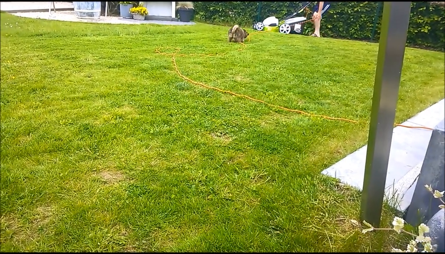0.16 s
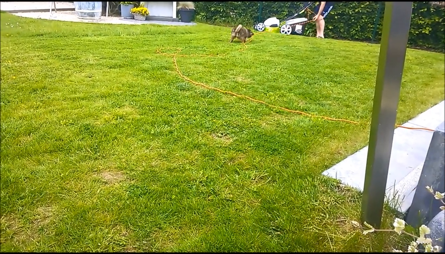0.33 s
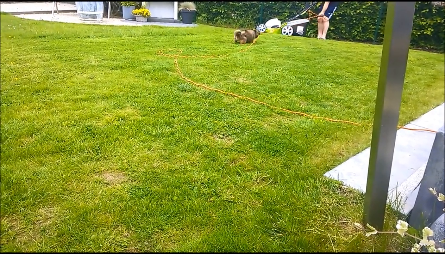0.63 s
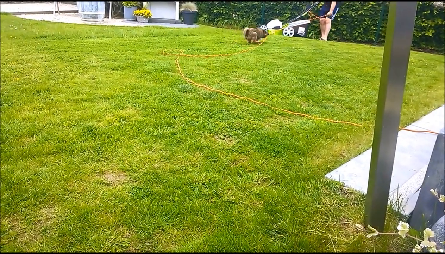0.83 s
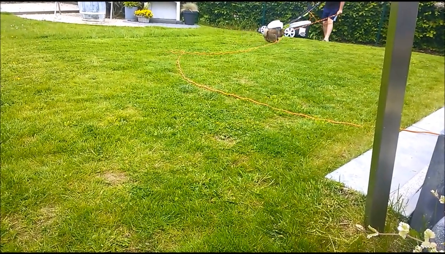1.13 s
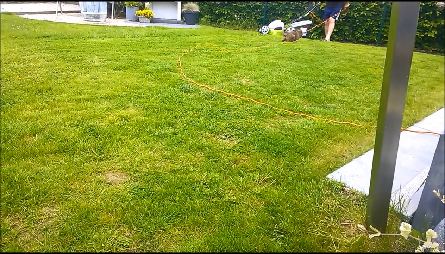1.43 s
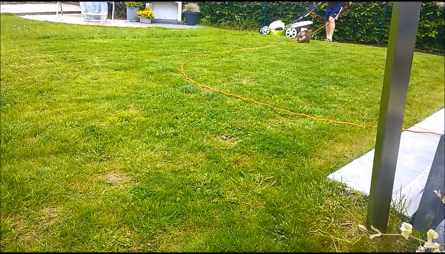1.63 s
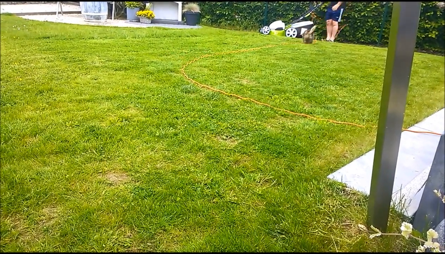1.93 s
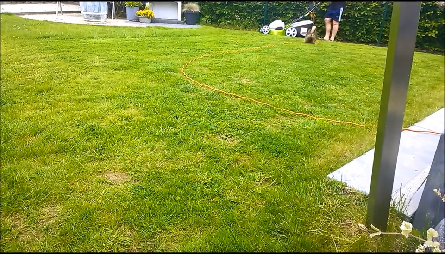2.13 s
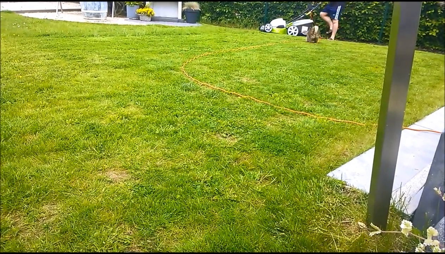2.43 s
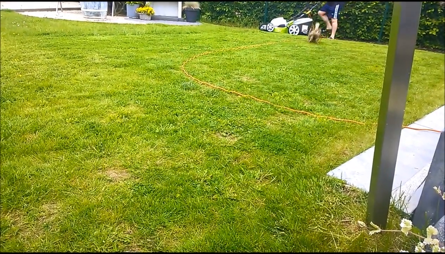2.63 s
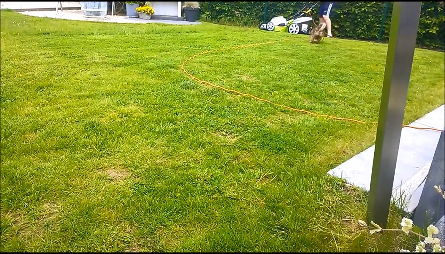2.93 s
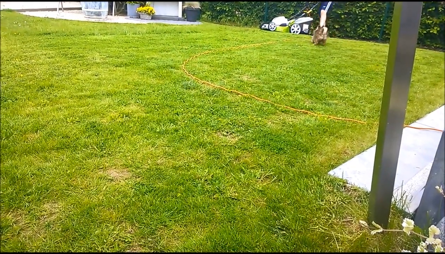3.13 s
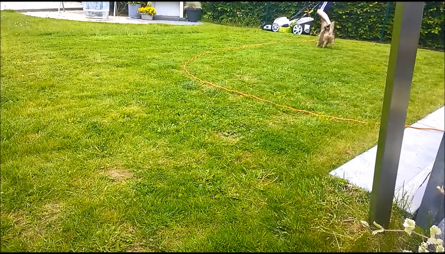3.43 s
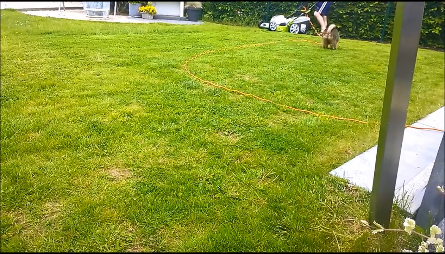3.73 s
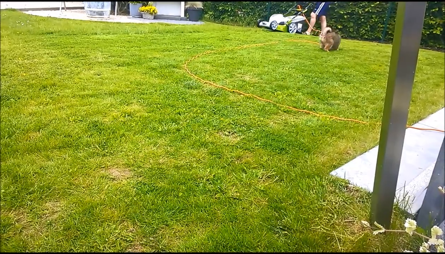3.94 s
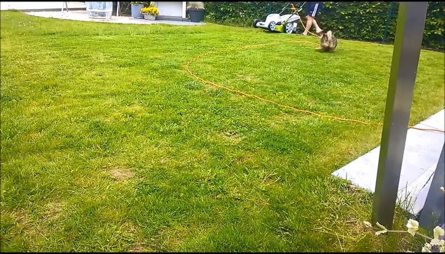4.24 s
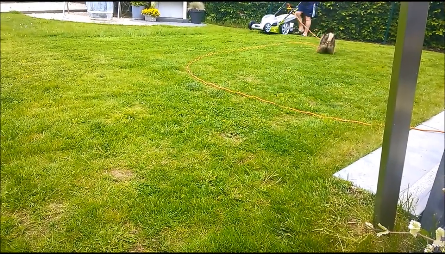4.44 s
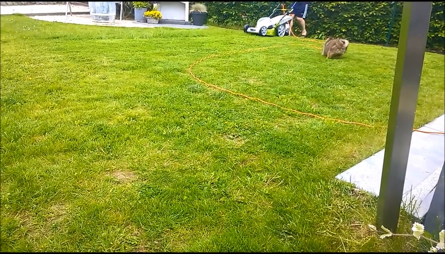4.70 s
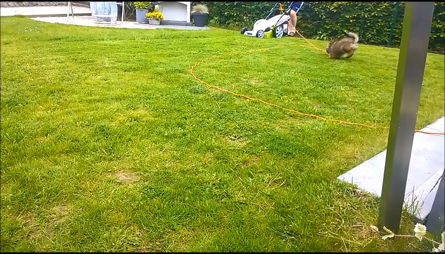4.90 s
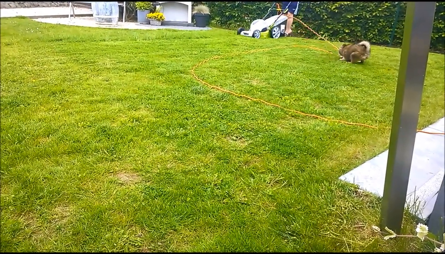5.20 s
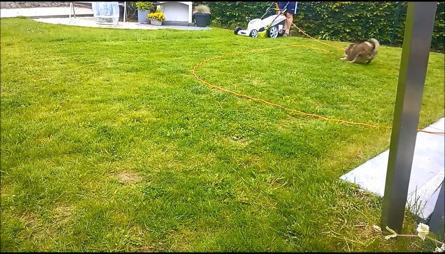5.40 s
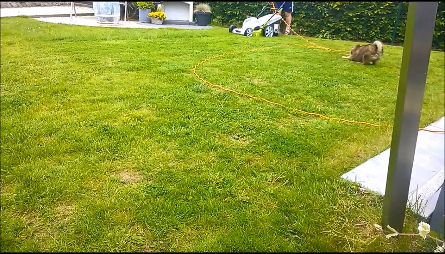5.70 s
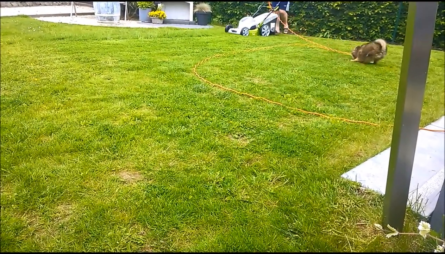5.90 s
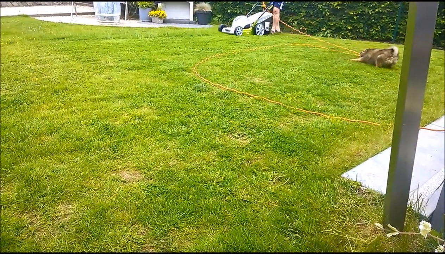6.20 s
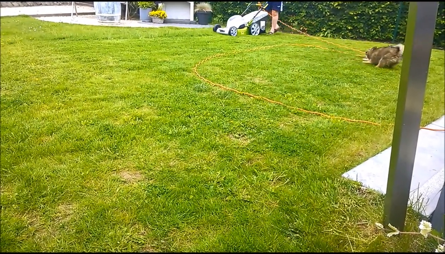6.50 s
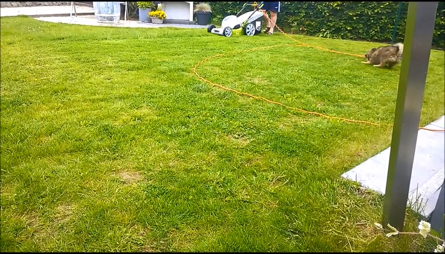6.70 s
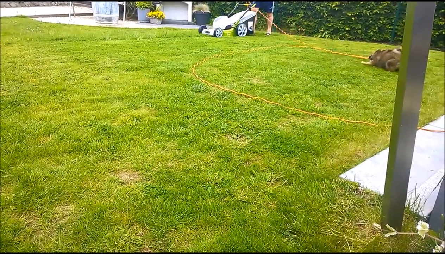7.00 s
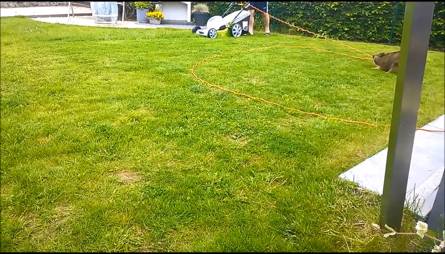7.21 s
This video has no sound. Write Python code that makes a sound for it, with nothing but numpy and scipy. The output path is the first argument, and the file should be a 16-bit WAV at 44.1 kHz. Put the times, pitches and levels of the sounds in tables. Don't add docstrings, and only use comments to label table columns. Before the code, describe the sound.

Outdoors in a garden, a steady low electric motor and blade drone dominates, with soft air roar and faint grass hiss. Very faint bird chirps hide beneath it early on. The mower swings round: the tone swells with raspy overtones, then the deep hum drops while a breathy, gusting hiss comes forward. Late on, blade and twigs collide in two woody cracks. Distant fixed microphone, slight microphone hiss.

```python
import sys
import numpy as np
from scipy import signal
from scipy.fft import rfft, irfft, next_fast_len
from scipy.io import wavfile
from scipy.ndimage import uniform_filter1d

SR = 44100
rng = np.random.default_rng(int(sys.argv[2]) if len(sys.argv) > 2 else 0)


def unload_wav(signal):
    wavfile.write(
        sys.argv[1],
        SR,
        np.round(np.clip(np.atleast_2d(signal).T, -1, 1) * 32767).astype(np.int16),
    )


def level_to_linear(level):
    exponent = np.asarray(level, float) / 20
    return 10 ** exponent


N = 324130
TIME = np.arange(N) / SR


def curves(table):
    s, *columns = np.transpose(table)
    return [np.interp(TIME, s, column) for column in columns]


def walk(rate):
    hold = int(SR / rate)
    steps = np.repeat(rng.standard_normal(N // hold + 1), hold)
    return 1.3 * uniform_filter1d(uniform_filter1d(steps, hold), hold)[:N]


def swells(rows):
    return sum(db * np.exp(-((TIME - s) / width) ** 2) for s, width, db in rows)


def gust(s, db, held, rise_db, fall_db):
    return db - rise_db * np.clip(s - TIME, 0, None) - fall_db * np.clip(TIME - s - held, 0, None)


def noise(spectrum, patchy_db, rate, within=(0, SR)):
    size = next_fast_len(N)
    hz = np.arange(1, size // 2 + 2) * SR / size
    f, db = np.transpose(spectrum)
    colour = level_to_linear(np.interp(np.log(hz), np.log(f), db, -150, -150))
    bins = rfft(rng.standard_normal(size)) * colour
    inside = irfft(bins * (hz > within[0]) * (hz < within[1]), size)
    place = 2 * np.log2(hz / f[0])
    out = 0
    for band in range(int(2 * np.log2(f[-1] / f[0])) + 2):
        share = np.clip(1 - abs(place - band), 0, 1)
        out = out + irfft(bins * share, size)[:N] * level_to_linear(patchy_db * walk(rate))
    return out / inside.std()


# (time [s], blade pass [Hz], hum level [dB], lift of the deck tones [dB])
SWING = [(0, 97.95, -26, -1.5), (1.12, 97.65, -26.5, -0.7), (2.38, 98.2, -26, -2), (3.15, 97.5, -30.5, 2.5),
         (3.25, 97.5, -29.0, 3), (3.6, 96.7, -28, 2), (3.72, 97.34, -30.2, 4.5), (4.18, 97.44, -23.2, 9),
         (4.38, 97.17, -23.5, 9.5), (4.73, 97.48, -25.5, 11.5), (4.88, 96.4, -32.5, 10.3),
         (5.12, 96.3, -34.9, 6), (5.5, 96.6, -34.7, 6.5), (5.9, 97.07, -26.5, 5.5),
         (6.12, 96.79, -30.5, 3.2), (6.38, 96.5, -27.5, 4.5), (6.48, 96.7, -31, 4), (7.35, 97.3, -25.5, 5)]


def swing():
    return curves(SWING)


# (time [s], share of direct sound [0-1])
FACING = [
    (0, 0),
    (3.75, 0.16),
    (4.25, .95),
    (4.82, .95),
    (5.05, 0.2),
    (7.35, 0),
]


def facing():
    return curves(FACING)[0]


def turned():
    turn_s, turn_length_s = 4.83, .05
    return np.clip((TIME - turn_s) / turn_length_s, 0, 1)


# (time [s], half width [s], level [dB])
THICK_GRASS = [
    (0.0, .12, 1),
    (2.7, .2, 1.5),
    (3.65, .25, 2),
    (4.92, .09, 3.5),
    (6.2, .22, 3.5),
    (6.95, .1, 1.2),
]


def thick_grass():
    return swells(THICK_GRASS)


# (level with the deck down [dB], share of the lift [ratio], flutter [dB])
ORDER_RULES = [
    (-29.1, 0.035, 0.1),
    (-46.5, 0.91, .6),
    (-39.5, -0.034, .5),
    (-44, 0.62, .8),
    (-48, 1.37, .5),
    (-59, 1.1, 1.0),
    (-51.8, 0.5, .8),
]
# (time [s], half width [s], level [dB])
ECHO_SWELLS = [
    [(2.93, 0.49, 3.5), (3.6, .06, 2.5), (3.93, 0.096, 5.5), (4.53, .2, -2), (5.62, 0.4, 3), (5.93, .06, 3),
     (6.45, 0.21, -8), (6.47, .035, -9), (7.02, .09, 3), (7.35, 0.075, 1.5)],
    [(.03, 0.16, 6.8), (.53, .3, -3.5), (2.48, 0.051, -5.5), (3.53, 0.14, 5.5), (4.62, .2, 3),
     (5.0, 0.068, -4.1), (5.28, .09, 8.5), (6.23, 0.26, 3.5), (6.68, 0.78, 5), (6.85, 0.092, 4),
     (7.23, 0.089, 4.5)],
    [(.73, .45, 1.2), (2.43, 0.15, -4), (2.93, 0.17, 2), (3.97, .1, 5), (4.6, 0.19, 1.5), (5.2, 0.24, -5.9),
     (5.98, .1, -16), (6.14, .1, -16), (6.65, 0.37, -5)],
]
# (time [s], half width [s], level [dB])
DECK_SWELLS = [
    [(2.85, .3, 3), (4.3, .49, 4), (5.27, .17, -6.5), (6.33, 0.81, -2.5), (7.1, .035, -10),
     (7.3, 0.11, 8.5)],
    [(.12, .13, -4), (2.9, .45, 4.5), (3.85, 0.09, -4), (5.65, .2, 2.5), (6.28, 0.055, -4),
     (6.58, .11, 5.5)],
    [(.08, .35, 7.5), (3.28, 0.12, -8), (3.8, .15, 4), (5.1, .09, -10), (5.45, 0.17, 4), (6.43, 0.056, -7),
     (6.98, .2, 6)],
    [(.23, 0.14, -8), (3.05, .45, -5.5), (3.5, .06, -7), (3.72, .12, 2.5), (4.38, .04, -8), (5.1, .12, 1),
     (5.7, .06, 2.5), (5.9, .7, 4), (7.2, 0.049, 6.5)],
]


def order_levels(hum_db, lift_db):
    levels = [hum_db]
    for (db, share, flutter_db), rows in zip(ORDER_RULES, ECHO_SWELLS + DECK_SWELLS):
        levels.append(db + share * lift_db + swells(rows) + flutter_db * walk(6))
    return levels


def tone(turn, order, db, rough_db, wander):
    scatter = rng.uniform(-np.pi, np.pi) + wander * walk(0.786)
    phase = order * turn + .07 * order ** 2 + (1 - facing()) * scatter
    return np.sqrt(2) * level_to_linear(db + rough_db * walk(18)) * np.cos(phase)


# (order of the blade pass, level re order 8 [dB])
TOP_ORDERS = [
    (9, -5),
    (10, -12),
    (11, -20.5),
    (12, -17.5),
]
# (order of the blade pass, level re -24.5 dB [dB])
UNEVEN_ORDERS = [
    (.5, -41),
    (1.5, -27),
    (2.5, -32.5),
    (4.5, -34),
]


def blade(turn, low_db, deck_db):
    low = sum(tone(turn, k + 1, db, 0.3 + 0.067 * k, 1.0) for k, db in enumerate(low_db))
    deck = sum(tone(turn, k + 5, db + 0.54, 1.0, 0.59) for k, db in enumerate(deck_db))
    top = sum(tone(turn, k, deck_db[-1] + db, rough_db=0.0, wander=0.57) for k, db in TOP_ORDERS)
    uneven = sum(tone(turn, k, -24.5 + db, rough_db=5.0, wander=2.1) for k, db in UNEVEN_ORDERS)
    return low + deck + top + uneven


# (frequency [Hz], level [dB per Hz])
LOW_ROAR = [(12, -17), (25, -14.5), (38, -10.5), (50, -4.5), (61, 0.5), (70, -3), (80, -3), (122, -5),
            (165, 0), (232, -1), (268, -2.5), (330, -6.5), (440, -4.5), (600, -16.5)]


def low_air():
    db = -48 - 1.1 * turned() + 0.98 * walk(3)
    return level_to_linear(db) * noise(LOW_ROAR, 0.88, 4, within=(112, 180))


# (frequency [Hz], level [dB per Hz])
DECK_ROAR = [(220, -10.5), (330, 8), (445, 10), (560, 9), (640, 2.5), (730, 4), (830, 6.5), (950, 4),
             (1000, 0.5), (1150, 0), (1265, 0.5), (1335, -8), (1500, -14.5), (2000, -30)]


def deck_air(lift_db):
    db = -53 + .45 * lift_db + .5 * thick_grass()
    return level_to_linear(db) * noise(DECK_ROAR, 1.0, 8, within=(900, 1350))


# (frequency [Hz], level [dB per Hz])
CLIPPINGS = [(1200, -15.5), (1450, -4.5), (1700, 4), (2000, 3), (2300, -2), (2750, -4.5), (3200, -7.5),
             (3800, -9.5), (4500, -13.5), (4900, -19), (5400, -29.5), (6500, -46)]


def clippings(lift_db):
    db = -65.5 + 0.16 * lift_db * (1 - turned()) + 6.5 * turned() + thick_grass()
    return level_to_linear(db) * noise(CLIPPINGS, 1.3, 8.5, within=(1500, 4800))


# (frequency [Hz], level [dB per Hz])
WHISTLE = [(3800, -16.5), (4600, -10), (5250, -9.5), (5600, -1.5), (6100, -1), (6700, -7), (7400, -11.5),
           (8100, -18), (9000, -26), (9500, -41.5)]
# (time [s], level [dB], held [s])
FAN_GUSTS = [(4.02, -81, .02), (4.13, -74, 0.074), (4.25, -69.5, .02), (4.33, -70, 0.043), (4.44, -72, .03),
             (4.61, -72, 0.11), (4.86, -65, 0.066), (4.96, -67, 0.081), (5.12, -69.5, .04),
             (5.2, -69.5, .05), (5.32, -71, .02), (5.4, -72, 0.031), (5.52, -75, 0.019), (5.59, -78, 0.056),
             (5.74, -77, 0.095), (5.91, -72.5, .12), (6.12, -70, 0.077), (6.259, -70.5, .1),
             (6.411, -70, 0.079), (6.55, -83, 0.069), (6.685, -75, 0.014), (6.78, -79, 0.028),
             (6.89, -77.5, .1), (7.1, -75, .04), (7.21, -76, 0.029)]


def fan():
    rise_db_s, fall_db_s = 200, 140
    gust_db = np.max([gust(*row, rise_db_s, fall_db_s) for row in FAN_GUSTS], axis=0)
    seen_db = gust(4.12, -81, 2.38, rise_db_s, fall_db_s) + 1.5 * walk(14)
    hidden_db = -87.5
    power = level_to_linear(2 * gust_db) + level_to_linear(2 * seen_db) + level_to_linear(2 * hidden_db)
    return np.sqrt(power) * noise(WHISTLE, .7, 25, within=(5400, 8000))


def drone():
    phase = 2 * np.pi * np.cumsum(61.7 + 1.5 * walk(5)) / SR
    return np.sqrt(2) * level_to_linear(-50.5 + 1.3 * walk(5.4)) * np.sin(phase)


# (time [s], peak level [dB], ring [Hz], decay [s])
SNAPS = [
    (0.0338, -51.5, 5340, 0.0046),
    (1.347, -52, 2900, .006),
    (5.714, -53, 4000, .02),
    (6.8798, -29, 824, 0.015),
    (7.1847, -15.2, 1000, 0.009),
]


def snaps():
    out = np.zeros(N)
    for s, db, hz, t60 in SNAPS:
        t = np.clip(TIME - s, 0, None)
        ring = np.sin(2 * np.pi * hz * t) * np.exp(-np.log(1000) * t / t60)
        crack = np.sin(2 * np.pi * 1.68 * hz * t) * np.exp(-np.log(1000) * t / (0.35 * t60))
        contact = np.hanning(int(.28 * SR / hz) + 3)
        out -= level_to_linear(db) * np.convolve(ring + 0.74 * crack, contact / contact.sum())[:N]
    return out


# (time [s], length [s], level [dB], frequency [Hz], width [Hz])
CHIRPS = [
    (0.755, .05, -83, 5300, 600),
    (1.22, .04, -87.5, 5450, 200),
    (1.61, .05, -82.5, 5500, 700),
]


def chirps():
    out = 0
    for s, length, db, hz, width_hz in CHIRPS:
        swell = np.sin(np.pi * np.clip((TIME - s) / length, 0, 1))
        spectrum = [(hz - width_hz, -12), (hz, 0), (hz + width_hz, -12)]
        out = out + level_to_linear(db) * swell * noise(spectrum, 0, 5)
    return out


# (frequency [Hz], level [dB per Hz])
OPEN_DECK = [(2200, -17.5), (2600, -0.5), (3500, 0.5), (4600, -4), (5200, -8), (5800, -16.5)]


def open_deck():
    return level_to_linear(-71.5) * facing() * noise(OPEN_DECK, 1.7, 11.0)


# (frequency [Hz], level [dB per Hz])
DECK_MOUTH = [(600, -22), (780, -2), (870, -2), (960, -3), (1150, -16.5), (1250, -29)]


def deck_mouth():
    return level_to_linear(-46) * swells([(4.5, .5, 1)]) * noise(DECK_MOUTH, .5, 7.9)


# (frequency [Hz], level [dB per Hz])
CHUTE = [(1900, -15), (2200, 0), (2600, 0), (2900, -15)]


def chute():
    return level_to_linear(-70) * turned() * noise(CHUTE, 1.5, 7.5)


# (frequency [Hz], level [dB per Hz])
SPRAY = [(3500, 0), (4500, 6), (6500, 8), (8100, 2), (9400, -2), (10200, -2), (12000, -0.5), (14000, -6),
         (16500, -2)]


def spray():
    db = gust(4.885, -71, held=.035, rise_db=560, fall_db=300)
    return level_to_linear(db) * noise(SPRAY, 0.28, 22, within=(8500, 15500))


def air(turn, lift_db):
    push = 1 + 0.22 * np.cos(turn)
    return low_air() + (deck_air(lift_db) + deck_mouth()) * push


def hiss(turn, lift_db):
    throw = 1 + 0.08 * np.cos(turn / 2)
    return throw * (clippings(lift_db) + open_deck() + chute() + fan()) + spray()


# (delay [s], gain [ratio])
ECHOES = [
    (.0013, 0.1),
    (.0041, -0.096),
    (.0097, 0.17),
    (.017, .15),
    (.029, -0.1),
]


def garden(x):
    echoes = sum(gain * np.interp(TIME - delay * (1 + .04 * walk(.7)), TIME, x) for delay, gain in ECHOES)
    return (x + echoes) / np.sqrt(1 + sum(gain ** 2 for _, gain in ECHOES))


def scene():
    hz, hum_db, lift_db = swing()
    turn = 2 * np.pi * np.cumsum(hz + .15 * walk(7)) / SR
    levels = order_levels(hum_db + 0.37 * walk(7.6), lift_db)
    tones = blade(turn, levels[:4], levels[4:])
    mower = tones + garden(air(turn, lift_db) + hiss(turn, lift_db)) + snaps()
    return (mower + chirps() + drone())[None]


def low_pass(x):
    return signal.sosfilt(signal.butter(12, 15750, fs=SR, output="sos"), x)


# (frequency [Hz], level [dB per Hz])
MIC_HISS = [(3000, -4.5), (6000, 0), (7400, 0), (8800, 2.5), (9450, 0), (10200, 5.5), (11000, -0.5),
            (12000, -1), (13600, 3.5), (16500, -0.5)]


def record(dry):
    clock_hz, top_hz = 16000, 15720
    mirror = level_to_linear(-58) * dry * np.cos(2 * np.pi * clock_hz * TIME)
    heard = dry + mirror + level_to_linear(-86) * noise(MIC_HISS, .3, 5)
    heard = signal.sosfilt(signal.ellip(12, .1, 70, top_hz, fs=SR, output="sos"), heard)
    return low_pass(heard)


dry = scene()
out = record(dry)
unload_wav(out)
```